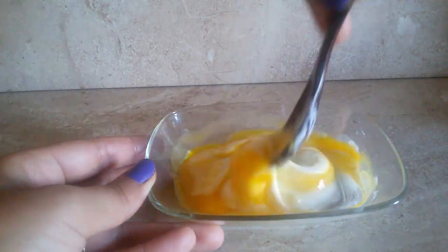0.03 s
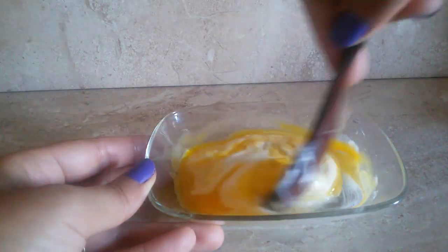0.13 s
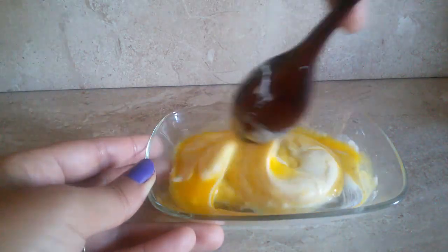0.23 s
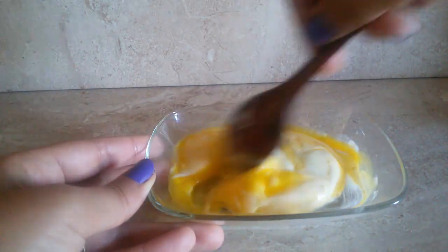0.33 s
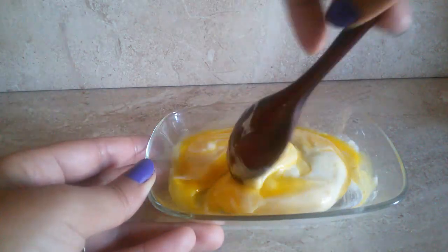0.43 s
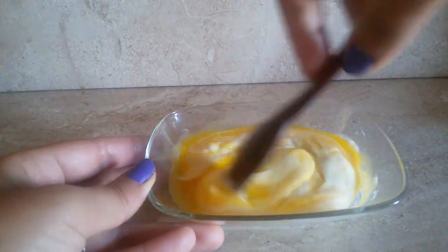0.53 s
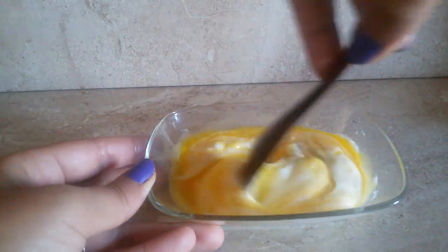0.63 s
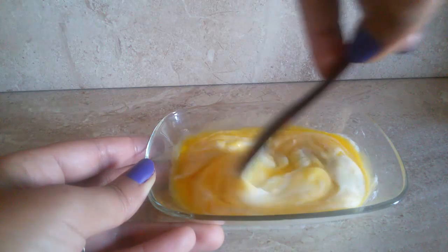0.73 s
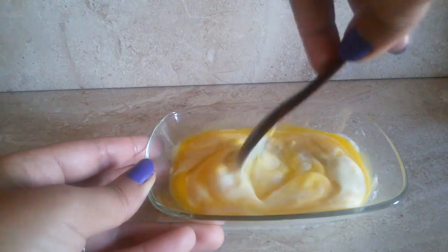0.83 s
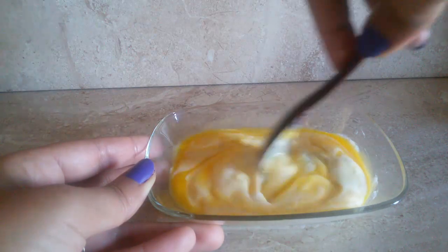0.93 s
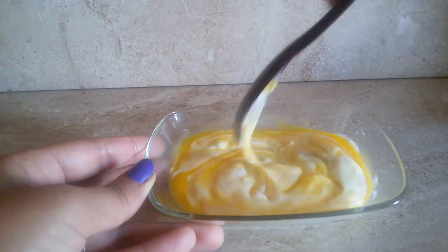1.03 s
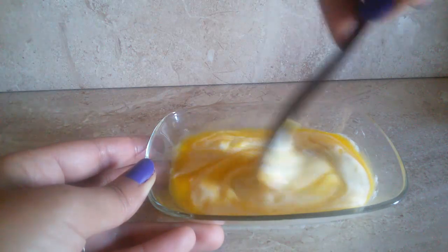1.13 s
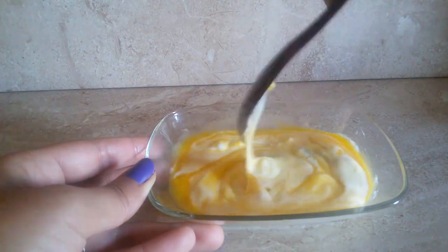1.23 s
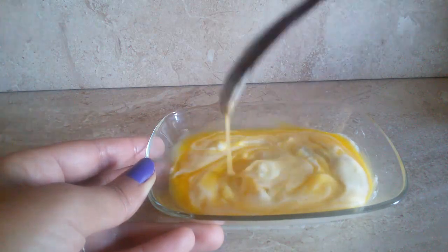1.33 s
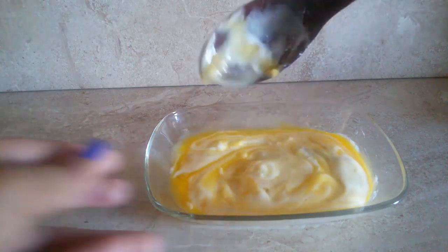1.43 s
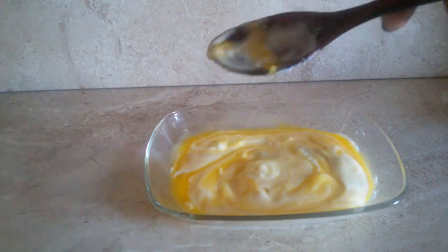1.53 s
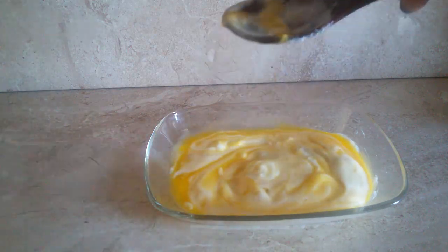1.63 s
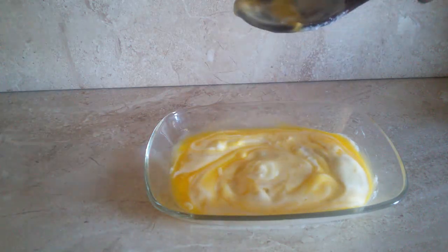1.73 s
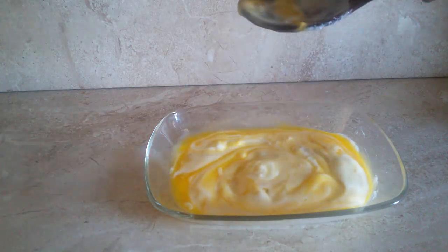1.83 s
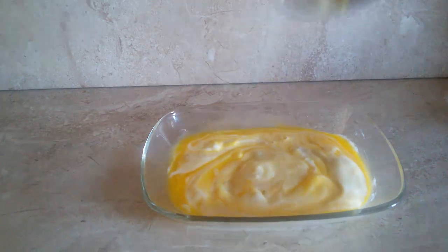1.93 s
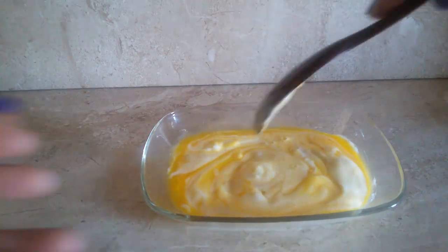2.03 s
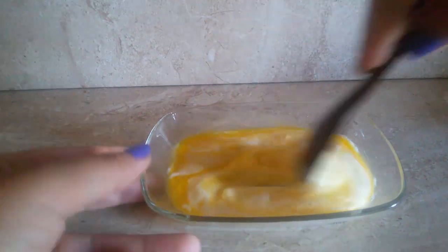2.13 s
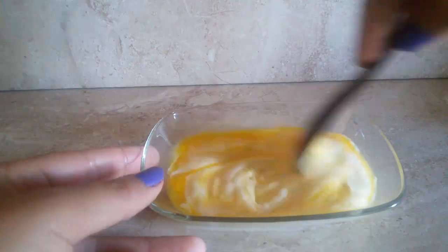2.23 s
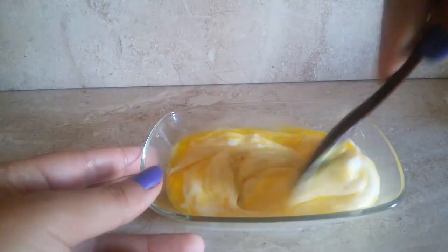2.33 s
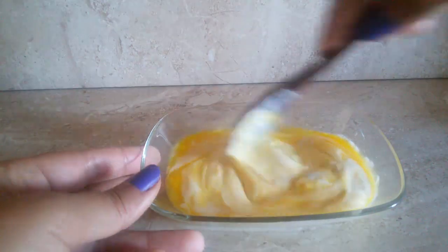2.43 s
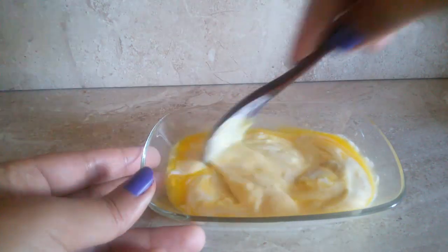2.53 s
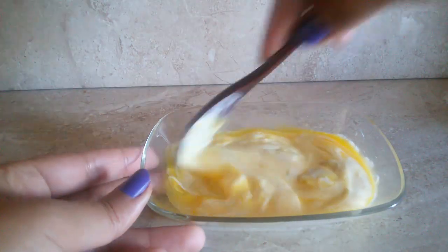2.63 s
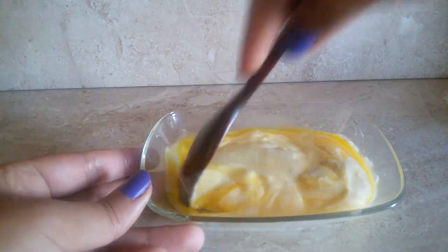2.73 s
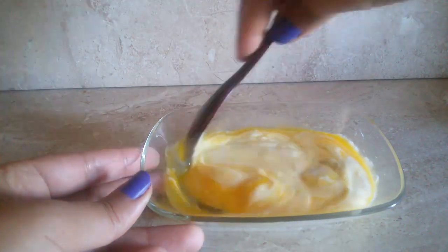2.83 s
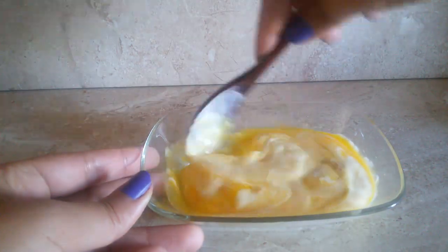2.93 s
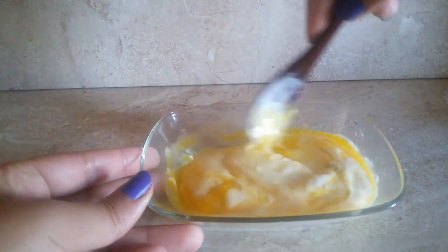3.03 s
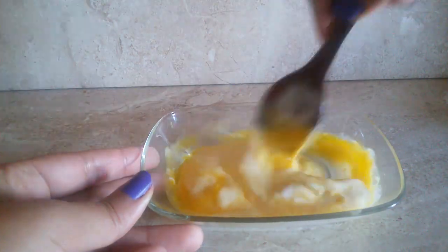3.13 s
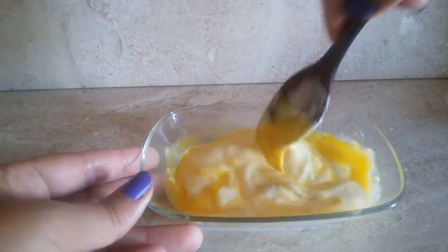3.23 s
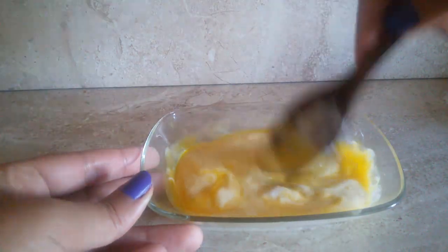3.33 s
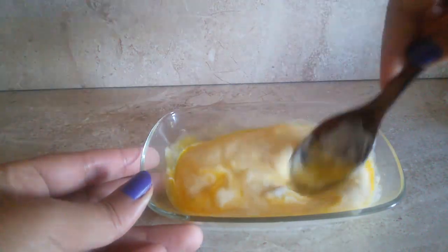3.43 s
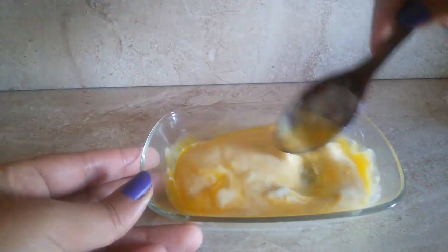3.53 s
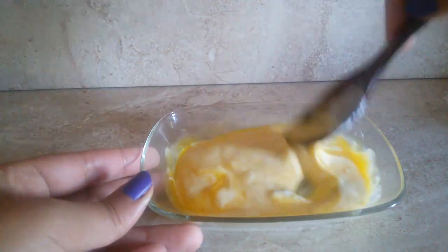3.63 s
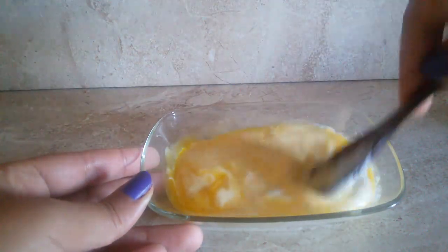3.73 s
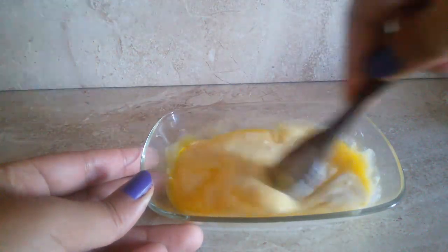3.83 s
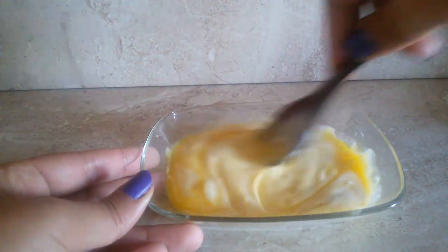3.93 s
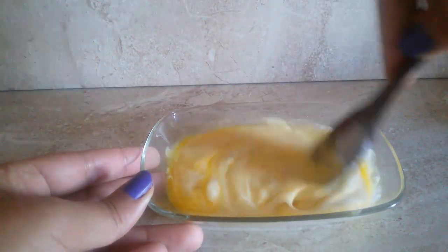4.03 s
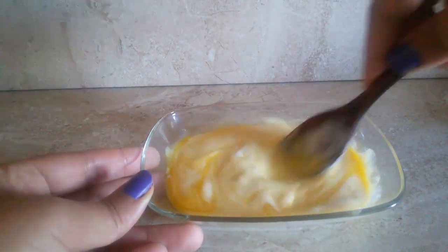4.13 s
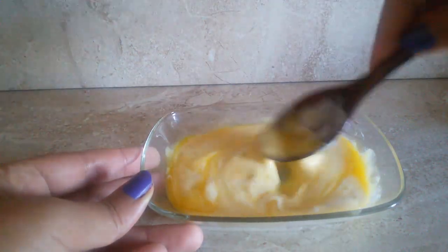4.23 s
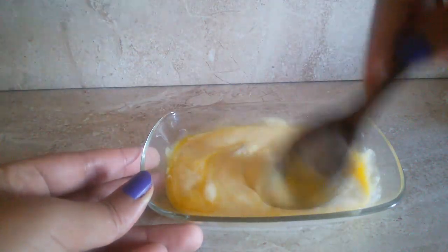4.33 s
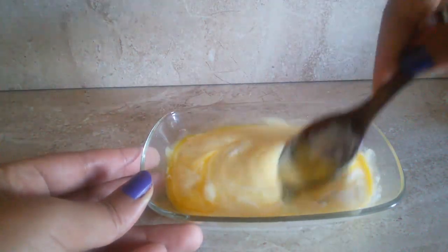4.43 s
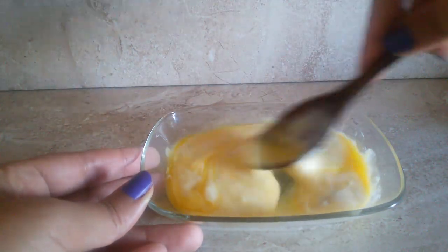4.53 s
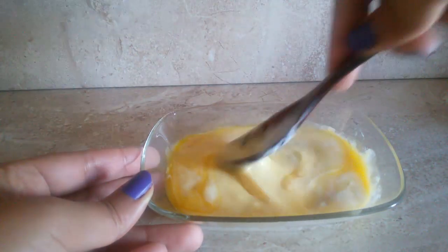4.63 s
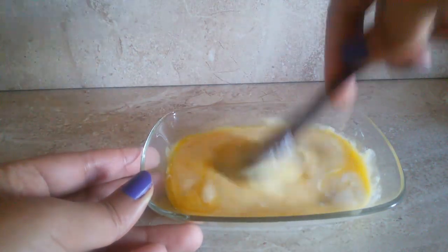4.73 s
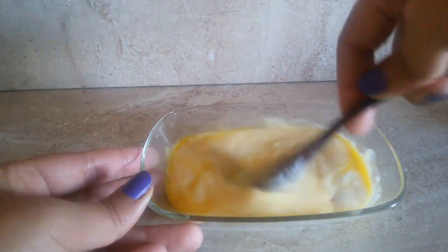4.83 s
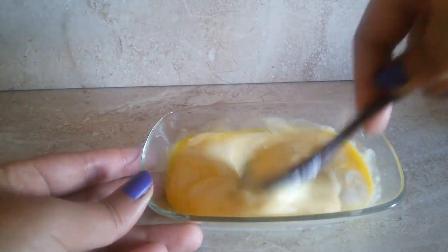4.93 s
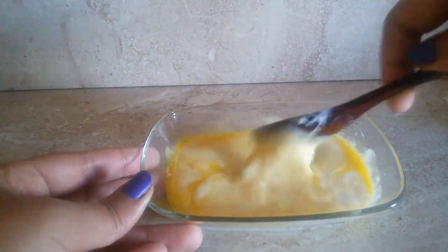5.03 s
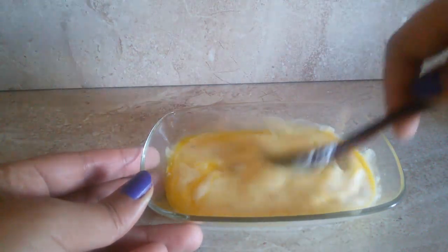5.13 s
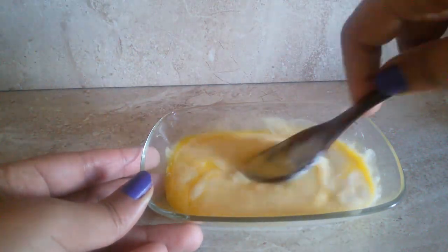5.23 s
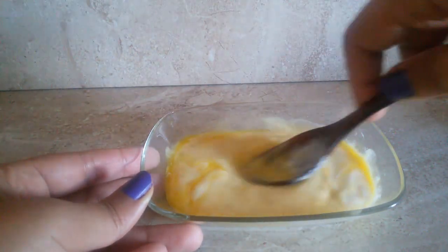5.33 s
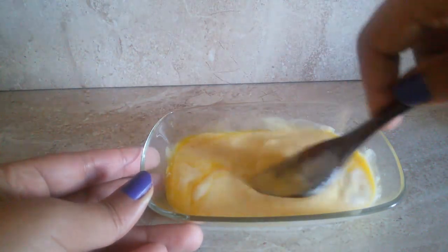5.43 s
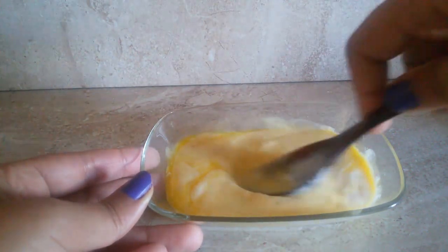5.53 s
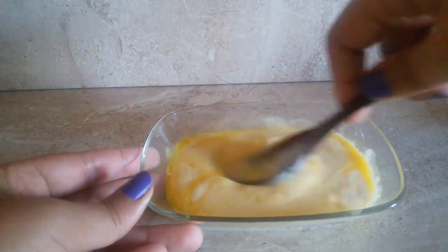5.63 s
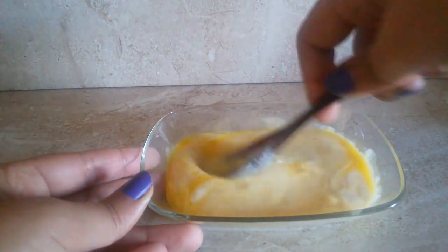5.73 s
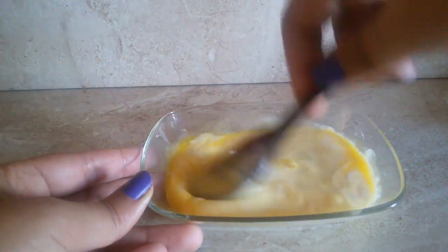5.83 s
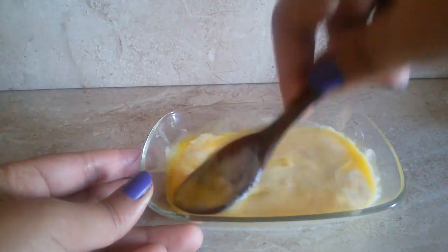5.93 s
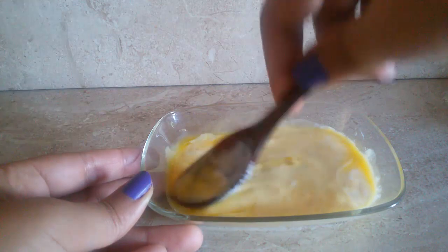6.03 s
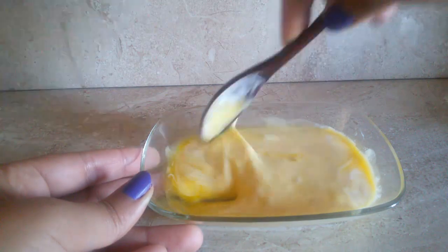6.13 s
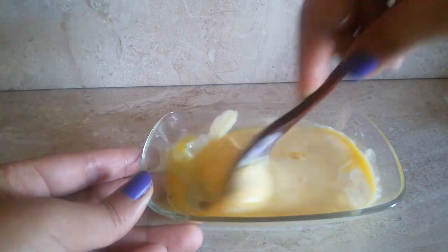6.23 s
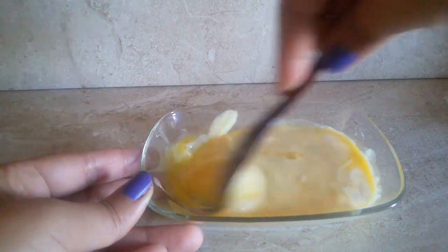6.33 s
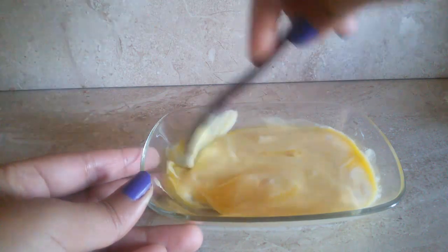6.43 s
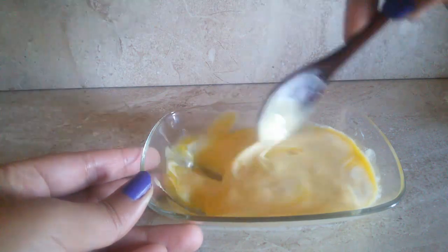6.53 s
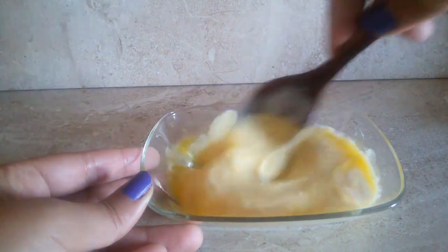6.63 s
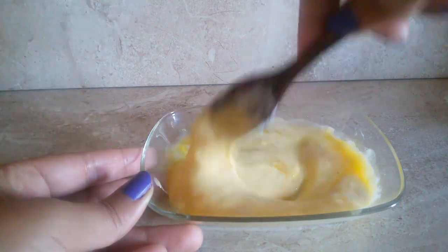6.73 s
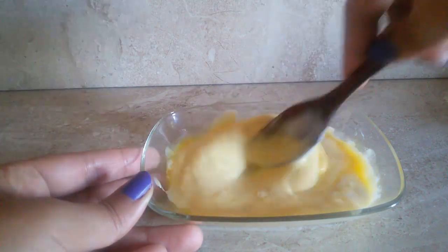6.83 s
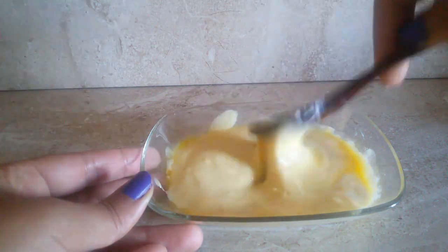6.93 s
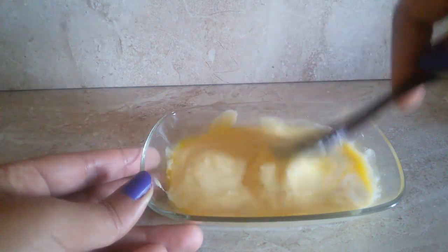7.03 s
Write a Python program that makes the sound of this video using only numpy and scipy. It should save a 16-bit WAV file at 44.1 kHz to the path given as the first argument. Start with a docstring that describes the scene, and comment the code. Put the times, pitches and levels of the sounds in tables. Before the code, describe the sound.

A close mono microphone hears a spoon stirring a thick, creamy mixture in a glass dish. After a brief quiet start, a bright clink lands at 0.15 s, then faint ticks and soft rubbing until a firm tap at 0.95. Three strong, sharp clinks follow at 1.14, 1.24 and 1.33, the last with a low jolt. The spoon lifts, leaving room air and faint hum until two quick clinks near 2.2. From 2.5 the ticks crowd together, peaking in hard hits at 2.88 and 2.98. From 3.3 to 5.3 lighter, irregular taps continue over low churning and tiny wet smacks. Small scrapes appear around 5.7 to 6.0, then a moderate cluster of clinks from 6.1 to 6.5, and weak taps to about 7. Rings are short and damped, with a small hard-walled reflection; a thin tone lingers quietly.

```python
"""A spoon stirs a thick egg and cream mixture in a hand-held glass dish on a kitchen counter, close to a mono microphone.
It clicks against the glass in quick runs: blow, chatter, short damped ring and the answer of the tiled corner.
Between clicks, shaped noise and grains make the scrapes, churning and soft wet smacks; low pulses make the
jolts of the dish, and a low resonance swells. Behind it lie quiet room air, a faint hum and a thin tone."""
import sys
import numpy as np
from scipy import signal
from scipy.fft import rfft, irfft, next_fast_len
from scipy.io import wavfile
from scipy.ndimage import map_coordinates

SR = 44100
rng = np.random.default_rng(int(sys.argv[2]) if len(sys.argv) > 2 else 0)


def unload_wav(signal):
    """Save mono or channel-first audio to the path in sys.argv[1] as 16-bit WAV at rate SR, clipped to [-1, 1]."""
    wavfile.write(
        sys.argv[1],
        SR,
        np.round(np.clip(np.atleast_2d(signal).T, -1, 1) * 32767).astype(np.int16),
    )


N = 312228  # length in samples

# Spoon meets glass. Each row: start in seconds, strength in dB, knock in dB and hardness in dB (both before
# weighting over frequency), spoon resonance in Hz, its height in dB, glass ring in dB.
CONTACTS = [(0.1534, -9, 8, -5.5, 10800, 15, 7), (0.1577, -9, -6.5, 12, 2500, 11, 7),
            (0.2094, -24, 14.5, -11, 13600, 13, -6), (.362, -32.5, 17.5, -6, 2390, 3, -14),
            (0.5244, -23.5, 8.5, -9, 7600, 8, -9), (0.5737, -23.5, 3, -19, 2920, 10, 9),
            (0.5766, -18.5, 5, -20, 3340, 7, 5), (.6758, -30.5, 14, -2, 6800, 10, 5),
            (.8646, -21, 9, -14, 3600, 11, 0), (0.9489, -7, -8, -6.5, 8200, 4.5, -7),
            (1.139, -4.5, -2.5, 0.5, 9100, 5, -12), (1.2373, 2.5, -6.5, 5, 8000, 2, -6),
            (1.334, 2, -3, 4, 7400, 5, -8), (2.157, -4, -6, 9, 9700, 5.5, 0.5),
            (2.209, -24.5, 11, -2, 13500, 22, 0), (2.2196, -1, -5, -1, 8600, 6.5, 5),
            (2.234, -13, -3.5, 1, 2530, 13.5, 6), (2.32, -23, 9, -1, 3340, 8.5, -4),
            (2.5096, -19.5, 1, 4, 4380, 5, 4), (2.544, -21, 3, -5, 3660, 10, 13),
            (2.599, -20.5, 15, -7, 3800, 8, -10), (2.6096, -18, 4, -5, 11800, 10, 0),
            (2.6983, -8.5, 7.5, 5, 9400, 5.5, 6), (2.723, -21, 12, -8, 13500, 11, -4),
            (2.7926, -19, 16.5, 6, 1730, 6, 9), (2.8162, -18, 7, -13, 3270, 4, 2),
            (2.8753, -3, 2, 12, 9600, 6, 13), (2.9797, -3.5, -7, 6.5, 10200, 11, 12),
            (3.0973, -15.5, 0.5, -1, 11560, 3.5, 11), (3.1102, -18, 6, -10, 7200, -0.5, -4),
            (3.333, -16.5, 11, -6, 3680, 7.5, -14), (3.3396, -11, 1, -1, 5300, 12.5, -6),
            (3.3996, -13, -2, -3, 3980, 14.5, -10), (3.4087, -15, 3, 3.5, 5220, 9, 0),
            (3.4757, -21, 2.5, 2, 4700, 12.5, 3), (3.5475, -29.5, 3, 10, 5900, 12, -3),
            (3.6307, -21.5, -13, 12, 11400, 7, 10), (3.6367, -12, -1, 6, 5000, 13, 1),
            (3.721, -25, 6, -2.5, 5170, 6, -3), (3.786, -23.5, 13.5, -13, 5120, 2, -9),
            (3.854, -32, 17, -15, 13500, 11, 1), (3.9326, -26, 5, 3, 4470, 7.5, 0),
            (4.1899, -22, 13, 3, 4340, 15, -6), (4.269, -19.5, 1.5, -8, 3300, 8.5, 0),
            (4.343, -24.5, 9, 2, 3250, 7, 3), (4.4786, -13, -6, 5, 6020, 14.5, -5),
            (4.7201, -23, 11, -4, 9710, 7, 5.5), (4.799, -36.5, 9, 20, 5400, 18, -2),
            (4.8099, -32, 25.5, -3, 6460, 12, 2), (4.881, -19.5, -13, 4, 5600, 16.5, -1),
            (4.8986, -31, 8, 1, 6460, 15, -1), (4.9608, -12.5, -7.5, 0, 4730, 16.5, 2),
            (5.043, -37, 7, 7, 7400, 10, -5), (5.1846, -20.5, 2, 6, 13100, -8, 8),
            (5.1863, -11.5, -2.5, 9.5, 4670, 16.5, 5), (5.2956, -20.5, 8.5, -8, 4180, 7, 1),
            (5.3782, -37, 4, 7.5, 4470, 13, 0), (5.494, -14.5, 1.5, 3, 7160, 5.5, 2),
            (5.5767, -27.5, -15, 10, 4480, 18.5, 8), (5.5855, -18, 6.5, -25, 6900, 8.5, 0),
            (5.7946, -29.5, 2, -9, 7250, 5, 4), (6.1014, -11.5, 9.5, 7.5, 9500, 5.5, 11),
            (6.199, -12, -3.5, 5.5, 5800, 5.5, 12), (6.2284, -13.5, -1, 8, 2380, 7, 5),
            (6.2607, -24.5, 1, -13, 3820, 9, -3), (6.2795, -17, 4.5, -4, 5300, 8, -3),
            (6.3715, -13.5, 12.5, 1, 10200, 14, 15), (6.3944, -15, 8, -9, 4400, 1, -3),
            (6.412, -25, 14, -4, 3540, 4, -3), (6.5054, -16, 3.5, 0.5, 9900, 6, 10),
            (6.735, -21, 10.5, 8.5, 6100, 10, -11), (6.8008, -30, 4, 16, 8810, 5, 12),
            (6.944, -23.5, 6.5, 14, 7000, 5.5, 6)]
# Faint chance contact. One row: strength, knock, hardness in dB, spoon resonance in Hz, its height, ring in dB.
TYPICAL_GRAZE = (-39.5, 10.5, -2.5, 5200, 6.5, -2)
GRAZE_RATE = 4  # chance contacts a second while the spoon is fully in the mixture
# Spectrum of a typical contact. Each row: frequency in Hz, level in dB.
CONTACT_COLOUR = [(20, -14.5), (100, -25.5), (220, -7.5), (480, -11.5), (1350, -0.5), (2200, -5.5),
                  (2850, -7.5), (3400, -1.5), (4300, -3), (5500, -1), (7100, -2.5), (9300, 0.4),
                  (11000, -5.5), (15300, -10)]
# Ring of the damped dish. Each row: frequency in Hz, level in dB before the ring offsets, t60 in seconds.
DISH_MODES = [(209.8, -50, 0.17), (300.4, -54, 0.357), (732, -58.5, 0.23), (1023, -47, 0.23),
              (1307, -54.5, .18), (1397, -53.5, .16), (1624, -59.5, 0.05), (1777, -50, 0.15),
              (2560, -50.5, 0.16), (3390, -48.5, .1), (4220, -51.5, 0.083), (4777, -48, .08),
              (5685, -48, 0.074), (6500, -50, .08), (6370, -47.5, .1), (6400, -49, .1), (7100, -59.5, .09),
              (8673, -59, 0.077), (9900, -55, .08), (12300, -55, 0.0606)]
# Decay of the tiled corner. Each row: frequency in Hz, t60 in seconds.
CORNER_T60 = [(150, 0.051), (500, 0.28), (1500, 0.17), (4000, 0.15), (9000, 0.14), (15000, 0.19)]
# Colour of the tiled corner. Each row: frequency in Hz, relative level in dB.
CORNER_COLOUR = [(60, -1.5), (250, 4), (900, 3.5), (1500, -1.5), (2400, 2.5), (6000, 0.5), (15000, -4.5)]
# The spoon's edge judders over the glass. Each row: start in seconds, length in seconds, level in dB,
# tilt in dB per octave.
SCRAPE_STROKES = [(0.589, 0.031, -65, -11), (0.663, .06, -68, -9.5), (0.746, 0.081, -68.5, -11.5),
                  (2.397, 0.044, -64.5, -1.5), (2.476, .008, -47, 20), (4.641, 0.017, -62.5, -4),
                  (5.002, 0.0064, -54, 19), (5.698, 0.026, -63, -2), (5.822, 0.013, -60.5, -2),
                  (5.911, .031, -61, -3), (5.995, 0.054, -65.5, -0.5), (6.87, 0.0093, -57.5, 5.5)]
# Spectral shape of spoon slipping on glass. Each row: frequency in Hz, relative level in dB.
SCRAPE_COLOUR = [(1000, -25.5), (2800, -8.5), (3400, 1), (4000, -4), (4600, 0.5), (5400, -4.5), (6500, 0),
                 (7800, -1.5), (11000, -4), (15500, -8.5)]
# The dish jolts on the counter. Each row: start in seconds, level in dB before the pulse shape.
DISH_JOLTS = [(.154, -58), (1.332, -54.5), (2.8754, -51.5)]
# A low resonance near 300 Hz swells just after some contacts while the spoon stirs. Each row: start in seconds,
# # length in seconds, level in dB at the top of the swell.
LOW_SWELLS = [(0.17, 0.11, -62.5), (0.724, 0.083, -62), (2.197, 0.13, -67), (3.013, 0.14, -66),
              (4.228, 0.049, -65), (4.343, 0.15, -67.5), (4.99, 0.11, -66), (5.186, 0.12, -61.5),
              (6.372, 0.071, -58), (7.004, 0.098, -68.5)]
# Runs of stirring, with the spoon lifted between them. Each row: start in seconds, end in seconds,
# effort in dB, further pressure on the glass in dB.
STIRRING_RUNS = [(0.15, 0.465, -1, -3.5), (0.526, 0.987, -0.5, 2.5), (1.14, 1.458, 0, -4),
                 (2.16, 2.333, -1, -2), (2.5, 3.12, 2.5, -5), (3.37, 3.98, -0.5, -5.5),
                 (4.172, 5.347, -1, -1.5), (5.5, 5.95, -4.5, -2), (6.07, 6.516, -3, -7),
                 (6.766, 7.08, -4, -1.5)]
RUN_ATTACK_S, RUN_RELEASE_S = 0.06, 0.13  # the spoon dips in and lifts out
IDLE_DB = -7  # constant floor of the push, on which each run adds
SURGE_DB, SURGE_GROWS, SURGE_S = 4.5, 0.44, 0.1  # shove of a 0 dB contact, dB per dB of contact, length
# Spectral shape of the churning body. Each row: frequency in Hz, relative level in dB.
CHURN_COLOUR = [(30, -29), (100, -13), (160, -8), (230, 1), (330, -0.5), (440, -4), (600, -1), (780, -8.5),
                (1100, -13.5), (2000, -33)]
# Spectral shape of the wet smacks. Each row: frequency in Hz, relative level in dB.
SMACK_COLOUR = [(300, -25), (700, -7.5), (1000, 6.5), (1500, -2.5), (2100, -3), (3000, -6.5), (6000, -27)]
# Low resonances that the stirring wakes. Each row: centre in Hz, width in Hz, height in dB.
HOLLOW_MODES = [(307.6, 12, 9.5), (376.5, 6.1, 4.5), (574, 16, 1.5), (742, 25, 7), (1040, 5.2, 9)]
# Air pockets squelch in the mixture. Each row: start in seconds, length in seconds, centre in Hz, level in dB.
AIR_POCKETS = [(0.663, 0.085, 760, -65), (0.686, 0.039, 1716, -65), (0.775, 0.035, 834, -64.5),
               (0.994, 0.065, 860, -61.5), (6.79, 0.036, 565, -71)]
# Spectral shape of the quiet kitchen. Each row: frequency in Hz, relative level in dB.
AIR_COLOUR = [(25, -11), (60, -27), (120, -21), (200, -11.5), (290, -5), (440, -10), (620, -7.5),
              (850, -10.5), (1200, -13.5), (2200, -20), (5000, -24.5), (15000, -28.5)]
# Bands of the room's hum. Each row: centre in Hz, width in Hz, level in dB before the hum offset.
HUM_BANDS = [(299.2, 12.7, -76), (364.7, 4, -83.5), (565, 14, -82)]
TONE_DB, TONE_SINK_DB = -73.5, -5  # thin tone with the spoon in, and its change with the spoon lifted
TOP_HZ = 15650  # band limit


def taps(blow_db, chatter_db, chatter_t60, dish_db, room_db, tail_focus, ring_follows):
    """Each contact is a blow, a few milliseconds of chatter, the dish's short ring and the room."""
    out = np.zeros(N + SR)
    t = np.arange(SR // 3) / SR
    for start, db, *colour in CONTACTS + grazes():
        chatter = rng.standard_normal(len(t)) * amp(-60 * t / chatter_t60)
        strike = amp(chatter_db) * chatter / np.linalg.norm(chatter)
        strike[0] += amp(blow_db)
        tail = amp(room_db) * room_tail(t, build_up=0.0011)
        ring_offset_db = dish_db + ring_follows * colour[-1]
        for hz, level, t60 in DISH_MODES:
            ring_db = ring_offset_db + level + rng.normal(0, 2) - 60 * t / t60
            tail += amp(ring_db) * np.sin(2 * np.pi * hz * t)
        direct = signal.fftconvolve(strike, contact(*colour, focus=1))
        # the room gathers sound from all sides of the dish, which evens out the resonances
        answer = signal.fftconvolve(tail, contact(*colour, focus=tail_focus))
        sound = direct + answer
        out[round(start * SR):][:len(sound)] += amp(db) * sound
    return out[:N]


def contact(knock_db, hard_db, spoon_hz, spoon_db, ring_db, focus, spoon_width=0.13,
            ring_hz=6350, ring_width_hz=260, size=2048):
    """One click, coloured by where and how hard the spoon lands; focus scales its resonances."""
    hz = np.fft.rfftfreq(size, 1 / SR) + 1
    knock = knock_db * along([(150, 0.3), (700, 0.77), (1600, 0.61), (3500, 0.018)], hz)
    edge = hard_db * along([(6000, 0), (13000, 0.86)], hz)
    spoon = spoon_db * np.exp(-0.5 * (np.log(hz / spoon_hz) / spoon_width) ** 2)
    glass = ring_db * np.exp(-0.5 * ((hz - ring_hz) / ring_width_hz) ** 2)
    return causal(along(CONTACT_COLOUR, hz) + knock + edge + focus * (spoon + glass))


def grazes(count=60):
    """Faint, dull contacts at random moments of the runs, drawn from count candidates, as rows like CONTACTS."""
    chance, scatter = rng.random((count, 2)), rng.standard_normal((count, 3))
    db, knock_db, hard_db, spoon_hz, spoon_db, ring_db = TYPICAL_GRAZE
    odds = depth() * GRAZE_RATE * N / SR / count
    rows = []
    for (when, luck), (a, b, c) in zip(chance, scatter):
        if luck < odds[int(when * N)]:
            rows.append((when * N / SR, db + 2 * a, knock_db, hard_db + 4 * b,
                         spoon_hz * np.exp(0.34 * c), spoon_db, ring_db))
    return rows


def room_tail(t, build_up):
    """A fresh diffuse answer of the tiled corner, of energy 1: noise that decays at its own rate in each band."""
    hz, s, noise = signal.stft(rng.standard_normal(len(t)), SR, nperseg=256)
    decay_db = -60 * s / along(CORNER_T60, hz)[:, None]
    fade = amp(along(CORNER_COLOUR, hz)[:, None] + decay_db)
    tail = signal.istft(noise * fade, SR)[1][:len(t)] * (1 - np.exp(-t / build_up))
    return tail / np.linalg.norm(tail)


def scrapes(slip_rate, judder_db):
    """Short strokes of irregular stick and slip, ringing the spoon and the glass."""
    out = np.zeros(N)
    judder = amp(judder_db * wobble(240))
    slips = coloured(grains(rate=slip_rate, spread_db=3.5) * judder, SCRAPE_COLOUR)
    for s, length, db, tilt_db in SCRAPE_STROKES:
        start, n = round(s * SR), max(round(length * SR), 64)
        # the tilt pivots at 5 kHz and stays level below 1 kHz
        octaves = np.log2(np.maximum(np.fft.rfftfreq(n, 1 / SR), 1000) / 5000)
        stroke = irfft(rfft(slips[start:start + n]) * amp(tilt_db * octaves), n)
        out[start:start + n] += amp(db) * unit(stroke * np.sqrt(np.hanning(n)))
    return out


def stirring(churn_db, smack_db, scrape_db, smack_surge):
    """The spoon pushes the mixture, opens tiny wet pockets and slips over the glass; each listed contact adds a surge."""
    efforts = [amp(db) * dipped(start, end) for start, end, db, _ in STIRRING_RUNS]
    push = amp(IDLE_DB) + np.max(efforts, axis=0)
    pressures = [amp(db + pressure) * dipped(start, end) for start, end, db, pressure in STIRRING_RUNS]
    rub = np.max(pressures, axis=0)
    surge_power = sum((amp(SURGE_DB + SURGE_GROWS * db) * swell(s, SURGE_S)) ** 2 for s, db, *_ in CONTACTS)
    surge = np.sqrt(surge_power)

    body_level = np.hypot(push, surge) * amp(churn_db + 1.5 * wobble(25))
    body = body_level * coloured(rng.standard_normal(N), CHURN_COLOUR)
    wet_level = np.hypot(push, smack_surge * surge) * amp(smack_db + 4.5 * wobble(45))
    wet = wet_level * coloured(grains(rate=1200, spread_db=1.5), SMACK_COLOUR)
    slip_level = rub * amp(scrape_db + 4.6 * wobble(60))
    slips = slip_level * coloured(grains(rate=2200, spread_db=2.5), SCRAPE_COLOUR)

    def hollow(hz):
        """Gain of the low resonances, as bell-shaped peaks in dB."""
        return amp(sum(db / (1 + (2 * (hz - centre) / width) ** 2) for centre, width, db in HOLLOW_MODES))

    return filtered(body + wet, hollow) + slips


def dipped(start, end):
    """How deep the spoon is in the mixture during one run, 0-1: attack, hold, release."""
    t = np.arange(N) / SR
    attack = 1 + (t - start) / RUN_ATTACK_S
    release = 1 - (t - end) / RUN_RELEASE_S
    return np.clip(np.minimum(attack, release), 0, 1)


def depth():
    """How deep the spoon is over all runs, 0-1."""
    return np.max([dipped(start, end) for start, end, *_ in STIRRING_RUNS], axis=0)


def squelches(width_share, rough_db):
    """Each air pocket sounds a short, rough puff around its own resonance."""
    flutter = unit(amp(rough_db * wobble(220)))
    puffs = sum(amp(db) * swell(s, length) * narrow_noise(hz, width_share * hz)
                for s, length, hz, db in AIR_POCKETS)
    return flutter * puffs


def jolts(push_time):
    """A hard contact shoves the whole dish: one low push without a ring."""
    u = np.arange(SR // 10) / SR / push_time
    pulse = (1 - u) * np.exp(-u) * (1 - np.exp(-20 * u))
    out = np.zeros(N)
    for s, db in DISH_JOLTS:
        out[round(s * SR):][:len(u)] += amp(db) * pulse
    return out


def low_swells(centre_hz):
    """A low resonance swells for a moment: a tone of wandering pitch and level that rises and falls smoothly."""
    resonance = wavering(centre_hz, waver=0.04, rate=170) * unit(amp(2 * wobble(60)))
    return resonance * sum(amp(db) * swell(s, length) for s, length, db in LOW_SWELLS)


def kitchen(air_db, hum_db, tone_hz):
    """Steady room noise with a faint hum of narrow noise bands, and a thin tone that sinks as the spoon lifts."""
    air = amp(air_db) * coloured(rng.standard_normal(N), AIR_COLOUR)
    hum = sum(amp(db) * narrow_noise(centre, width) for centre, width, db in HUM_BANDS)
    tone_level = amp(TONE_DB + TONE_SINK_DB * (1 - depth()) + 1.4 * wobble(14))
    tone = tone_level * wavering(tone_hz, waver=0.005, rate=30)
    return air + amp(hum_db) * hum + tone


def narrow_noise(centre_hz, width_hz):
    """Noise in one resonance, at rms 1."""
    return unit(filtered(rng.standard_normal(N), lambda hz: 1 / (1 + (2 * (hz - centre_hz) / width_hz) ** 2)))


def wavering(hz, waver, rate):
    """A tone of rms 1 whose pitch wanders along a random curve, rate knots a second."""
    return np.sqrt(2) * np.sin(2 * np.pi * np.cumsum(hz * (1 + waver * wobble(rate))) / SR)


def swell(s, length):
    """A smooth rise and fall from s on."""
    return np.sin(np.pi * np.clip((np.arange(N) / SR - s) / length, 0, 1))


def grains(rate, spread_db):
    """Random tiny impulses of uneven size, rate a second on average, at rms 1."""
    sizes = amp(spread_db * np.clip(rng.standard_normal(N), -2, 2)) * rng.choice([-1, 1], N)
    return unit(sizes * (rng.random(N) < rate / SR))


def wobble(rate):
    """A smooth random curve, rate knots a second."""
    return map_coordinates(rng.standard_normal(int(N * rate / SR) + 4), [np.arange(N) * rate / SR])


def coloured(x, spectrum):
    """x with a (Hz, dB) spectrum, at rms 1."""
    return unit(filtered(x, lambda hz: amp(along(spectrum, hz))))


def filtered(x, gain):
    """x times a gain that depends on frequency."""
    m = next_fast_len(N + SR // 2)
    return irfft(rfft(x, m) * gain(np.fft.rfftfreq(m, 1 / SR)), m)[:N]


def causal(level_db):
    """The sharpest causal impulse response with this spectrum (minimum phase), by folding the cepstrum."""
    cepstrum = irfft(np.log(amp(level_db)))
    half = len(cepstrum) // 2
    cepstrum[1:half] *= 2
    cepstrum[half + 1:] = 0
    return irfft(np.exp(rfft(cepstrum)))


def along(points, hz):
    """Interpolate (Hz, value) points on a log frequency axis."""
    f, v = np.transpose(points)
    return np.interp(np.log(hz + 1), np.log(f + 1), v)


def unit(x):
    """Scale to rms 1."""
    return x / np.sqrt(np.mean(x ** 2) + 1e-20)


def amp(db):
    """Decibels to gain."""
    return 10 ** (np.asarray(db) / 20)


def scene():
    """Everything reaches one close microphone, alike in both channels; levels in dB, times in seconds."""
    clicks = taps(blow_db=-5.5, chatter_db=-3.5, chatter_t60=0.011, dish_db=-0.5, room_db=-9.5,
                  tail_focus=0.6, ring_follows=0.18)
    rubs = scrapes(slip_rate=1200, judder_db=8)
    corner = room_tail(np.arange(SR // 3) / SR, build_up=0.0015)
    rubs = rubs + amp(-10) * signal.fftconvolve(rubs, corner)[:N]
    mixture = stirring(churn_db=-72.5, smack_db=-79.5, scrape_db=-76.5, smack_surge=0.7)
    mixture = mixture + squelches(width_share=0.27, rough_db=2)
    low = jolts(push_time=0.003) + low_swells(centre_hz=297.3)
    room = kitchen(air_db=-69.0, hum_db=0.5, tone_hz=725.6)
    mono = clicks + rubs + low + mixture + room
    return np.array([mono, mono])


def record(dry):
    """A very steep low-pass leaves almost nothing above the band limit."""
    return np.array([filtered(x, lambda hz: 1 / np.sqrt(1 + (hz / TOP_HZ) ** 140)) for x in dry])


dry = scene()
out = record(dry)
unload_wav(out)
```